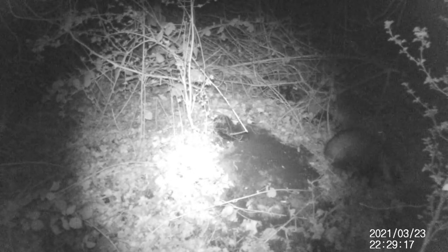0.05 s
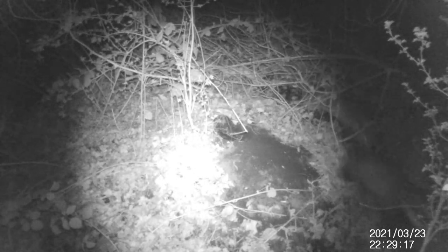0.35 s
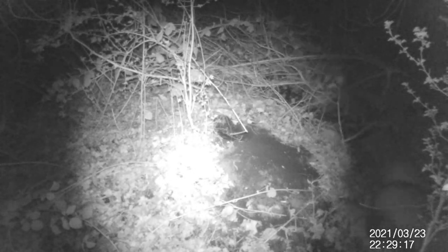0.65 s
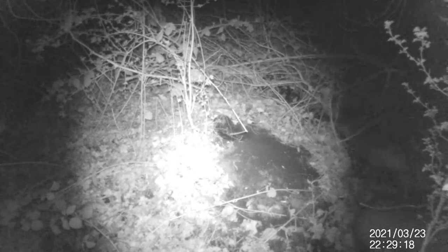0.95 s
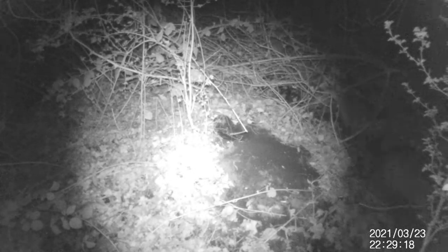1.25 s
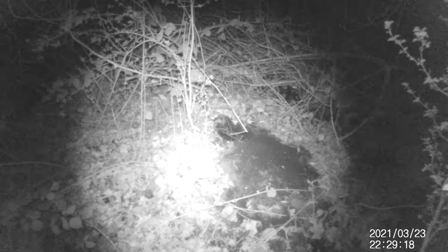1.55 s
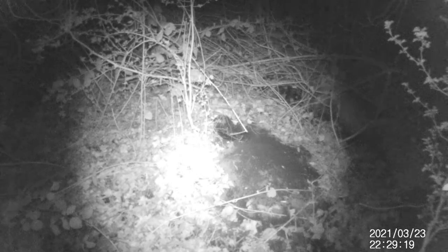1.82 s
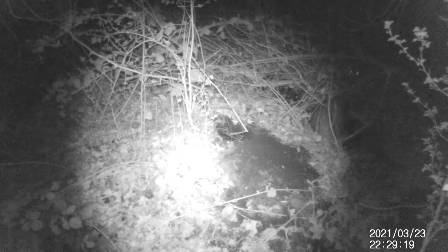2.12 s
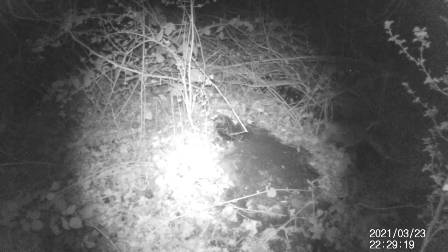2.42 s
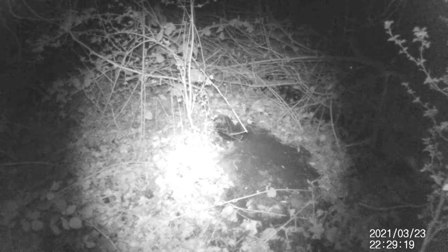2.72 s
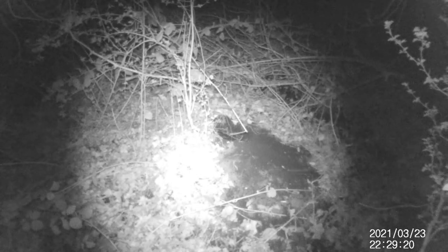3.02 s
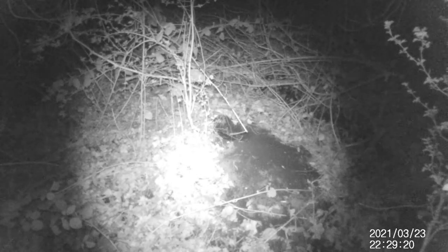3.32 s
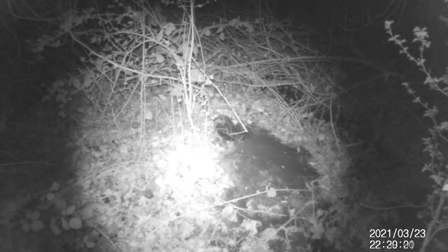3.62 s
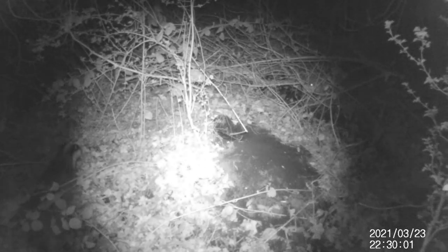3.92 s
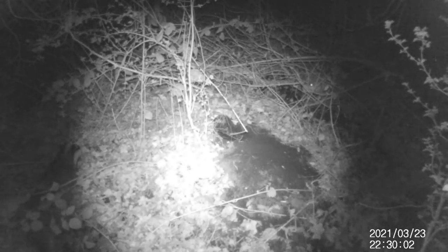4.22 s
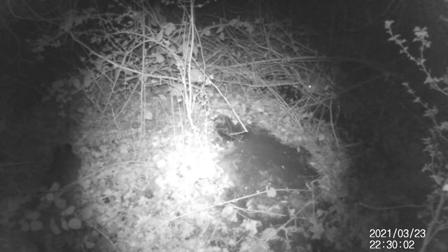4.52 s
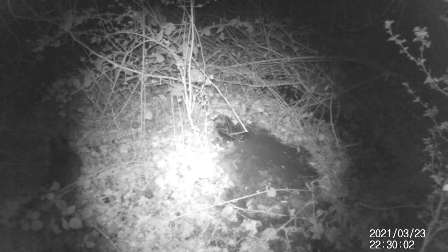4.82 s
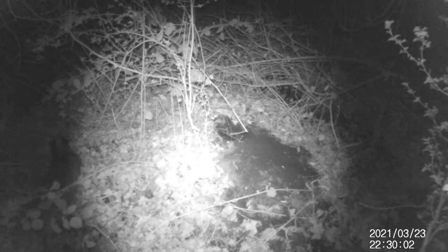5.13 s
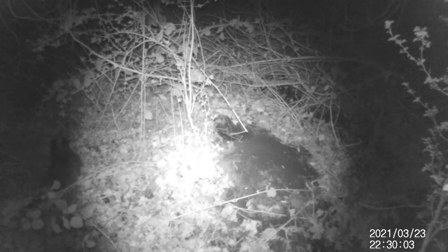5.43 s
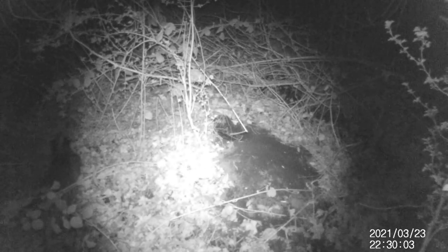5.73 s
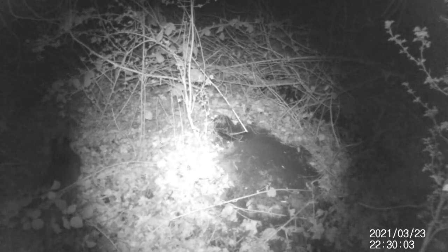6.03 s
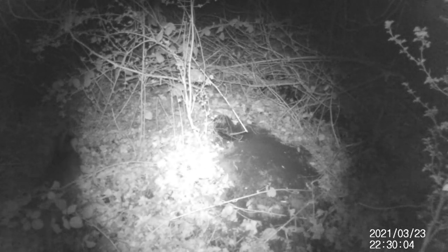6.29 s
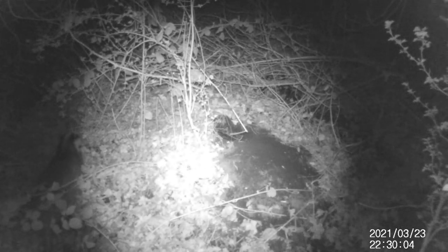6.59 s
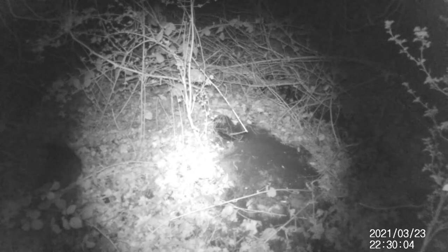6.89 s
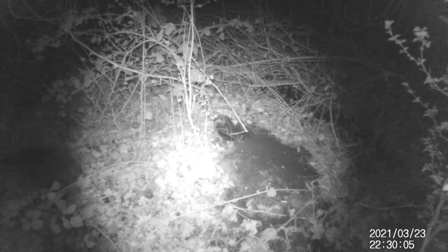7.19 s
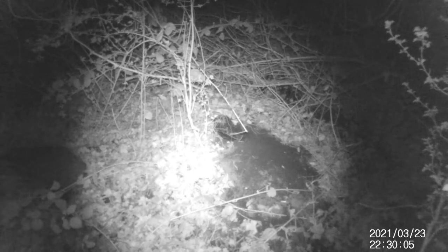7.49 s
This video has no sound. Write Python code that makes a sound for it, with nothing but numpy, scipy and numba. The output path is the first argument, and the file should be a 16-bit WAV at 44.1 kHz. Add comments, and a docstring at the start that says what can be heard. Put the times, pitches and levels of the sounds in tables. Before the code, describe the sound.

Dry leaves rustle and a twig snaps, then a fox and a badger clash twice with harsh, brief squeals, snarls and growls. One sharp stick crack follows, with soft thumps and scuffling as the animals move off through the night woods. After a quiet stretch, light steps and twig snaps return. Everything is picked up close by a small microphone with constant low hiss and slight distortion on the loudest cries.

```python
"""A fox and a badger quarrel in night woodland: torn squeals ride on a rattling snarl and a low growl.
Each voice is a source and a filter: uneven vibration of the vocal folds excites throat, mouth or chest.
Twigs and a stick fracture, paws thump and dry leaves rustle as the animals move off.
A small recorder close by hisses, overloads on the cries and keeps nothing of the high treble."""
import sys
import numpy as np
from scipy import signal
from scipy.fft import rfft, irfft, next_fast_len
from scipy.io import wavfile
from numba import njit

SR = 44100
rng = np.random.default_rng(int(sys.argv[2]) if len(sys.argv) > 2 else 0)


def inscribe(sig):
    """Save sig as 16-bit PCM at rate SR to the path in sys.argv[1].

    A 1-D sig is mono; a 2-D sig holds one channel per row.
    Samples are clipped to [-1, 1] before scaling.
    """
    pcm = np.round(np.clip(np.atleast_2d(sig).T, -1, 1) * 32767)
    wavfile.write(sys.argv[1], SR, pcm.astype(np.int16))


N = 332955
TIME = np.arange(N) / SR
BAND_HZ, TOP_HZ = 5880, 15700

# spectrum of the steady noise: (frequency [Hz], relative level [dB])
HISS_SPECTRUM = [(15, -34.5), (25, -2), (53, -2), (114, -12), (231, -11.5), (291, -13.5), (334, -10),
                 (410, -12.5), (471, -13.5), (835, -13.5), (1820, -29), (2000, -30.5), (4770, -39),
                 (6000, -51), (7800, -79.5), (13200, -120)]
# faint stirring of the litter, close at first, then far off: (time [s], level [dB])
STIRRING = [(0, -37), (2.2, -42), (3.9, -45), (3.94, -68.5), (4.4, -56), (5.7, -61), (7.55, -49)]
# a body or paw sweeps through leaves: (start [s], length [s], level [dB])
RUSTLES = [(0, 0.023, -28.5), (0.169, 0.19, -34), (0.451, .33, -30.5), (0.945, 0.31, -36.5),
           (1.222, 0.28, -29.5), (1.41, 0.51, -29), (1.918, 0.15, -34), (2.291, 0.13, -25.5),
           (2.559, 0.027, -35), (2.822, 0.076, -34), (3.142, 0.033, -39), (3.24, 0.067, -38.5),
           (3.464, 0.059, -29.5), (3.589, .13, -33), (3.77, 0.026, -39), (4.28, .03, -58),
           (4.469, 0.067, -45), (4.561, 0.048, -41.5), (4.875, 0.026, -47.5), (5.128, 0.25, -49.5),
           (5.85, 0.1, -59), (6.046, 0.14, -49.5), (6.46, 0.082, -51.5), (6.723, .03, -44.5),
           (6.841, 0.22, -42), (6.999, 0.058, -31.5), (7.118, 0.062, -37), (7.24, 0.028, -44),
           (7.54, .03, -32.5)]
# treads that crush the litter: (centre time [s], Gaussian half width [s], level [dB])
TREADS = [(-0.017, 0.053, -28), (2.151, 0.02, -32.5), (2.465, 0.017, -30.5), (2.833, 0.032, -32.5),
          (3.144, 0.019, -35.5), (3.495, 0.01, -23), (3.6, 0.029, -29.5), (6.094, .03, -43),
          (6.635, 0.0089, -33), (7.033, 0.027, -44)]
# spectra of brushed and of crushed leaves: (frequency [Hz], relative level [dB])
BRUSHED_SPECTRUM = [(200, -10), (400, -5), (700, -10.5), (1600, -3), (2300, -3.5), (3200, -3.5),
                    (4400, 1.5), (5200, 1), (6000, -14.5), (7000, -38.5)]
CRUSHED_SPECTRUM = [(150, -5.5), (400, -14.5), (900, -8.5), (1600, -2.5), (2800, -8), (4000, -5),
                    (6000, -17.5)]
# twig fractures, and at 0.46 s a sharp burst in the leaves: (time [s], relative peak level [dB])
SNAPS = [(0.2465, -10.5), (.4601, -13.5), (1.8816, -12.5), (2.015, -20), (2.8461, -12.5), (3.3125, -22),
         (3.4796, -20.5), (3.611, -12.5), (3.7235, -18.5), (4.3906, -33), (4.6065, -27.5), (5.4102, -33),
         (6.8458, -26.5), (7.035, -17), (7.074, -20.5), (7.1075, -14), (7.4806, -26)]
# squeals: (start [s], length [s], source level [dB], first pitch [Hz], last pitch [Hz], roughness [0-1])
SQUEALS = [(0.4803, .02, -8.5, 1756, 2850, 0.4), (0.499, 0.018, -6, 1621, 2367, 0.66),
           (.514, 0.041, -5, 1927, 1587, 0.58), (0.563, 0.0041, -7.5, 1580, 1490, 0.1),
           (0.642, 0.015, -15.5, 1188, 1503, 0.43), (0.963, 0.0045, -20.5, 1450, 1480, 0.4),
           (.979, 0.0078, -15, 1470, 1770, 0.2), (0.998, .042, -13, 1794, 1582, 0.33),
           (1.438, 0.046, -5.5, 1469, 1360, 0.8), (1.533, 0.017, -9, 1446, 1540, 0.35),
           (1.555, .013, -2, 1745, 1524, 0.7), (1.575, .026, -3, 1532, 1580, 0.8),
           (1.682, .004, -9, 1100, 1240, .5)]
# barks and snarls, one push of air each: (start [s], length [s], level [dB],
# first jaw factor on the formants [ratio], last jaw factor [ratio], hiss against the level [dB])
SNARLS = [(.483, .06, -10, 1.35, 1.7, -3), (.59, 0.078, -18, 1.12, 0.9, -10),
          (.678, 0.036, -15, .97, 1.02, -9.5), (.999, .035, -18.5, 0.89, 1.16, -10),
          (1.06, 0.037, -31, 1.12, 1.16, -15), (1.411, 0.039, -20, 1.14, 1.3, -2.5),
          (1.439, 0.029, -16, 1.05, 1.0, 5), (1.48, 0.048, -16.5, 1.03, 0.96, -20),
          (1.535, .075, -13.5, 1.0, 1.15, -12.5), (1.62, 0.081, -20, 1.02, 1.04, -19.5),
          (1.71, .11, -20.5, 1.0, .95, -7), (1.835, 0.05, -20, 0.88, 1.12, -11)]
# resonances of the throat, at jaw factor 1, and of the mouth: (centre [Hz], bandwidth [Hz], gain [dB])
THROAT_FORMANTS = [(1161, 340, 1.5), (1455, 100, 1.5), (1687, 350, 1.5), (2120, 300, -7),
                   (2650, 600, -14.5)]
MOUTH_FORMANTS = [(2745, 450, -2), (3690, 400, -1.5), (4440, 630, 1), (4810, 410, -1)]
# growls: (start [s], length [s], level [dB], first pitch [Hz], middle pitch [Hz], last pitch [Hz])
GROWLS = [(.497, .218, -27, 209.9, 181.8, 117.6), (1.0, .12, -37, 150.5, 124.9, 110.4),
          (1.22, .2, -37, 178.8, 192.3, 149), (1.46, .415, -27.5, 174.6, 238, 122),
          (2.13, .04, -35, 158.6, 158.2, 150.2), (2.37, .1, -38.5, 175, 164.3, 139.5),
          (2.64, .22, -40, 144.7, 151.2, 204.2), (6.42, .17, -46.5, 149.9, 165.7, 138)]
# response of the chest: (frequency [Hz], relative level [dB])
CHEST_SPECTRUM = [(70, -29.5), (130, -6), (220, -3), (330, -4), (480, 1.5), (750, -12), (1000, -4),
                  (1800, -35)]
# bodies and paws bump soil and dead wood: (time [s], level [dB], centre [Hz], 60 dB decay time [s])
THUMPS = [(2.214, -32, 490, 0.39), (2.39, -32, 341, 0.47), (2.609, -27, 789, 0.12),
          (3.436, -30, 740, 0.049), (3.591, -39, 167, 0.14), (6.066, -34.5, 1560, 0.053),
          (6.511, -32, 138.3, 0.15), (6.541, -35.5, 2500, 0.048), (6.565, -32.5, 1980, 0.02),
          (6.612, -30.5, 1600, 0.028), (6.614, -31, 375, 0.083), (6.626, -36, 3730, 0.015)]
# stages of a stick giving way: (time [s], level [dB], 60 dB decay time [s])
CRACK_STAGES = [(2.298, -22, .06), (2.3063, -8, .012), (2.3080, 7, .024)]
# spectrum of the crack: (frequency [Hz], relative level [dB])
STICK_SPECTRUM = [(100, -6), (500, -14), (850, -21.5), (1300, -5.5), (2500, -9.5), (4400, 0.5), (5400, -1),
                  (6300, -31.5), (8000, -59)]


def undb(db):
    """Amplitude ratio of a level in decibels."""
    return 10 ** (np.asarray(db) / 20)


def unit(x):
    """Normalisation to rms 1."""
    return x / (np.std(x) + 1e-12)


def noise():
    """Gaussian white noise."""
    return rng.standard_normal(N)


def curve(rows):
    """Linear interpolation of (time [s], value) rows."""
    return np.interp(TIME, *np.transpose(rows))


def wander(hz):
    """Random fluctuation: noise low-passed at the given rate."""
    return unit(signal.sosfilt(signal.butter(2, hz, fs=SR, output="sos"), noise()))


def burst(start, t60):
    """Free decay: a sudden onset that falls 60 dB in t60 seconds."""
    age = TIME - start
    return (age >= 0) * np.exp(-np.log(1000) * np.clip(age / t60, 0, 2))


def envelope(start, length, attack_s, release_s):
    """Exponential growth up to the start, a hold for the length, then exponential decay."""
    early, late = np.maximum(start - TIME, 0), np.maximum(TIME - start - length, 0)
    return np.exp(-np.minimum(early / attack_s + late / release_s, 20))


def ring(x, hz, width):
    """Second-order resonance, gain 1 at its centre."""
    return signal.lfilter(*signal.iirpeak(hz, hz / width, fs=SR), x)


@njit
def sweep(x, hz, width):
    """Second-order resonance with a moving centre."""
    y, band_state, low_state = np.empty(len(x)), 0., 0.
    for i in range(len(x)):
        g, damping = np.tan(np.pi * hz[i] / SR), width / hz[i]
        band = (band_state + g * (x[i] - low_state)) / (1 + g * (g + damping))
        band_state, low_state = 2 * band - band_state, low_state + 2 * g * band
        y[i] = damping * band
    return y


def colour(x, points):
    """Minimum-phase filtering through (frequency [Hz], level [dB]) points; the result has rms 1."""
    hz, db = np.transpose(points)
    size = next_fast_len(N + 8192)
    size += size % 2
    freq = np.maximum(np.fft.rfftfreq(size, 1 / SR), 1)
    cepstrum = irfft(np.log(undb(np.interp(np.log(freq), np.log(hz), db))))
    cepstrum[1:size // 2] *= 2
    cepstrum[size // 2 + 1:] = 0
    return unit(irfft(rfft(x, size) * np.exp(rfft(cepstrum)))[:N])


def hiss(level_db=-41.5):
    """Self-noise of the recorder: stationary, and strongest in the bass."""
    return undb(level_db) * colour(noise(), HISS_SPECTRUM)


def movement(sag_db_per_s=12.5):
    """Incoherent sources add in power: slackening sweeps through the leaves, over a faint stirring."""
    power = undb(curve(STIRRING)) ** 2
    for start, length, db in RUSTLES:
        sag_db = sag_db_per_s * np.clip(TIME - start, 0, length)
        power += (undb(db - sag_db) * envelope(start, length, attack_s=.022, release_s=.037)) ** 2
    return np.sqrt(power)


def crackle(grains_per_s=2500, scatter_db=3.5, smear=.76):
    """Tiny leaf fractures form a Poisson train of uneven impulses, blended with noise."""
    sizes = undb(scatter_db * np.minimum(rng.exponential(size=N), 5))
    fractures = (rng.random(N) < grains_per_s / SR) * sizes * rng.choice([-1, 1], N)
    return unit(fractures) + smear * noise()


def leaves(flicker_db=2.07):
    """Countless fractures superpose into a rustle; a full tread crushes the deeper, duller litter."""
    pace = movement() * undb(flicker_db * wander(16))
    weight = sum(undb(db) * np.exp(-((TIME - s) / half) ** 2 / 2) for s, half, db in TREADS)
    return pace * colour(crackle(), BRUSHED_SPECTRUM) + weight * colour(crackle(), CRUSHED_SPECTRUM)


def twigs(gain_db=3, centre_hz=4450, width_hz=2400, shiver_db=-13):
    """Brittle fracture: each twig gives a sharp tick and a short shiver of the litter round it."""
    lowpass = signal.butter(8, BAND_HZ, fs=SR, output="sos")
    out = np.zeros(N)
    for start, db in SNAPS:
        i = slice(int(start * SR), int(start * SR) + SR // 8)
        fade = (burst(start, t60=.012) + undb(shiver_db) * burst(start, t60=.05))[i]
        excitation = signal.sosfilt(lowpass, fade * rng.standard_normal(len(fade)))
        snap = ring(excitation, centre_hz, width_hz)
        out[i] += undb(db + gain_db) * snap / abs(snap).max()
    return out


def folds(hz, jitter, scatter_db):
    """Vocal folds with jitter and shimmer: closure pulses, phase in the cycle, each cycle's strength."""
    turns = np.cumsum(hz * np.exp(jitter * wander(np.mean(hz) / 2))) / SR
    cycle = turns.astype(int)
    strength = undb(scatter_db * rng.uniform(-1, 1, N))[cycle]
    return np.diff(cycle, prepend=0) * strength, turns % 1, strength


def squeals(flutter_hz=400, waver=.11, overtone_db=-22, undertone_db=-9, edge_s=.001935):
    """Modulation: a slower, unsteady vibration tears a shrill whistle of the folds into sidebands."""
    _, phase, strength = folds(np.full(N, flutter_hz), jitter=.3, scatter_db=14)
    flutter = strength * np.cos(2 * np.pi * phase)
    shake, drift = wander(150), wander(302)
    out = np.zeros(N)
    for start, length, db, first_hz, last_hz, rough in SQUEALS:
        i = np.flatnonzero(abs(TIME - start - length / 2) < length / 2 + edge_s / 2)
        age = TIME[i] - start
        hz = (first_hz + (last_hz - first_hz) * age / length) * (1 + waver * rough * drift[i])
        angle = 2 * np.pi * np.cumsum(hz) / SR + .45 * rough * flutter[i]
        tone = np.sin(angle) + undb(overtone_db) * np.sin(2 * angle)
        tone += undb(undertone_db) * np.sin(angle / 3)
        torn = tone * (1 + rough * (.8 * flutter[i] + 1.2 * shake[i]))
        gate = np.sin(np.pi / 2 * np.clip(np.minimum(age, length - age) / edge_s + 1 / 2, 0, 1))
        out[i] += undb(db) * unit(torn) * gate
    return ring(out, hz=1750, width=1500)  # the open mouth


def snarl(rattle_hz=115.4, puff_cycles=.4):
    """Source and filter: ragged pulses excite the throat; each puff of air hisses through the teeth."""
    pulses, phase, strength = folds(np.full(N, rattle_hz), jitter=.18, scatter_db=4)
    opening = strength * np.exp(-phase / puff_cycles)
    drive = unit(pulses) + unit(opening * noise())
    rush = (opening + .4) * noise()
    teeth = unit(sum(undb(db) * ring(ring(rush, hz, width), hz, width)
                     for hz, width, db in MOUTH_FORMANTS))
    # the jaw carries all throat resonances up and down together
    jaw = curve(sorted(point for start, length, _, first, last, _ in SNARLS
                       for point in [(start, first), (start + length, last)]))
    throat = unit(sum(undb(db) * sweep(sweep(drive, hz * jaw, float(width)), hz * jaw, float(width))
                      for hz, width, db in THROAT_FORMANTS))
    voiced, hissed = np.zeros(N), np.zeros(N)
    for start, length, db, _, _, hiss_db in SNARLS:
        push = undb(db) * envelope(start, length, attack_s=.0012, release_s=.012)
        voiced = np.maximum(voiced, push)
        hissed = np.maximum(hissed, undb(hiss_db) * push)
    return voiced * throat + hissed * teeth


def growl(puff_cycles=.17, hum_db=-5, attack_s=.008, release_s=.024):
    """Aperiodic voicing: uneven pulses and breath excite the chest; only the fundamental stays clear."""
    pitch, effort = np.full(N, float(GROWLS[0][3])), np.zeros(N)
    for start, length, db, first_hz, middle_hz, last_hz in GROWLS:
        i = TIME > start - 2 * attack_s
        along = np.clip((TIME[i] - start) / length, 0, 1)
        arch_hz = middle_hz - (first_hz + last_hz) / 2
        pitch[i] = first_hz + (last_hz - first_hz) * along + arch_hz * np.sin(np.pi * along)
        effort += undb(db) * envelope(start, length, attack_s, release_s)
    pulses, phase, strength = folds(pitch, jitter=.08, scatter_db=10)
    breath = unit(np.exp(-phase / puff_cycles) * noise())
    hoarse = colour(unit(pulses) + breath, CHEST_SPECTRUM)
    hum = unit(strength * np.cos(2 * np.pi * phase))
    return effort * unit(hoarse + undb(hum_db) * hum)


def thumps(relative_width=.59):
    """Damped resonance: soil and dead wood answer each impact with a decaying band of noise."""
    excitation, out = noise(), np.zeros(N)
    for start, db, hz, t60 in THUMPS:
        width = relative_width * hz
        out += undb(db) * burst(start, t60) * unit(ring(ring(excitation, hz, width), hz, width))
    return out


def stick():
    """Progressive fracture: the stick splinters in three quick broadband bursts."""
    splinters = sum(undb(db) * burst(start, t60) for start, db, t60 in CRACK_STAGES)
    return splinters * colour(noise(), STICK_SPECTRUM)


def woods(x, t60=1.0, wet_db=-28, first_echo_s=.012):
    """Scattering from the bank and the trunks adds a faint reverberant tail."""
    tail = (noise() * burst(first_echo_s, t60))[:SR]
    return x + undb(wet_db) * signal.fftconvolve(x, tail / np.linalg.norm(tail))[:N]


def scene():
    """Superposition of the animals, the ground they fight on and a steady hiss, in one channel."""
    quarrel = woods(squeals() + snarl() + growl() + twigs() + stick() + thumps())
    return (quarrel + leaves() + hiss())[None]


def record(dry, ceiling=.81, gain=1.068, offset=.028):
    """Overload: the preamplifier saturates, the band is narrowed and overshoot clips at full scale."""
    saturated = dry / (1 + (dry / ceiling) ** 8) ** (1 / 8)
    lowpass = signal.firwin(161, BAND_HZ, fs=SR, window=("kaiser", 8))
    narrow = signal.fftconvolve(saturated, lowpass[None], "same")
    clipped = np.clip(gain * narrow + offset, -1, 1)
    return signal.sosfilt(signal.ellip(8, .2, 70, TOP_HZ, fs=SR, output="sos"), clipped)


dry = scene()
out = record(dry)
inscribe(out)
```